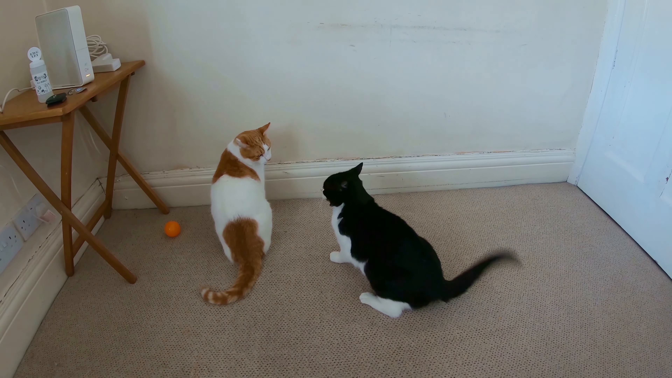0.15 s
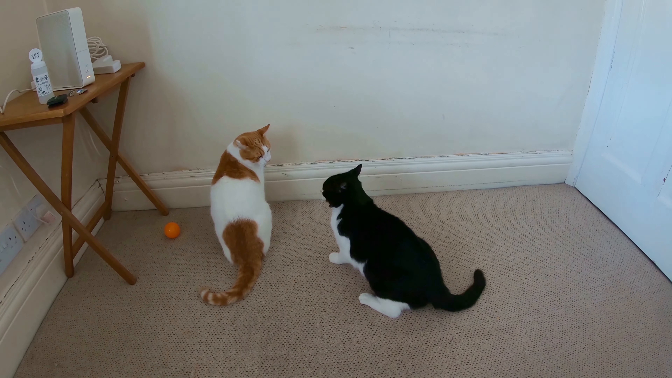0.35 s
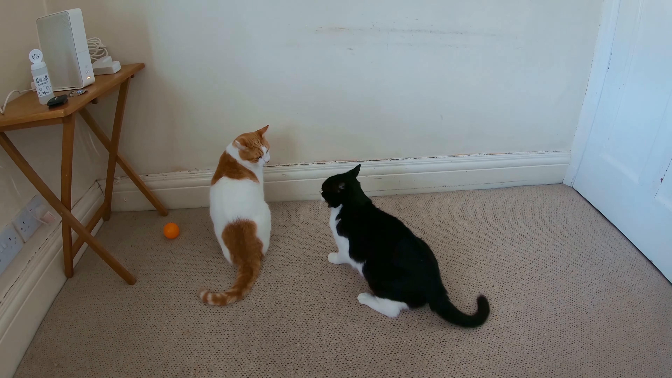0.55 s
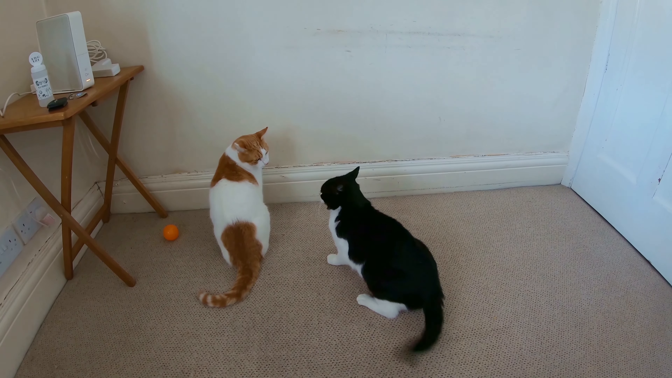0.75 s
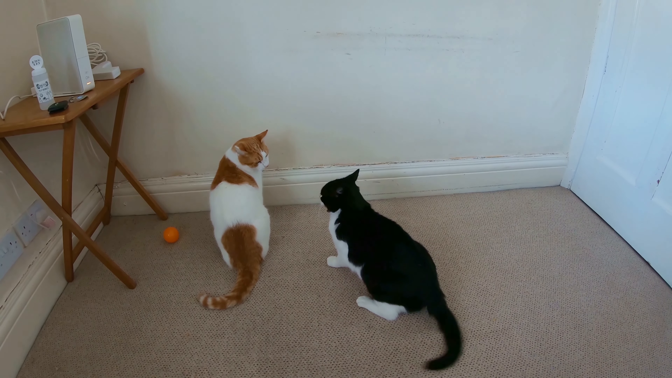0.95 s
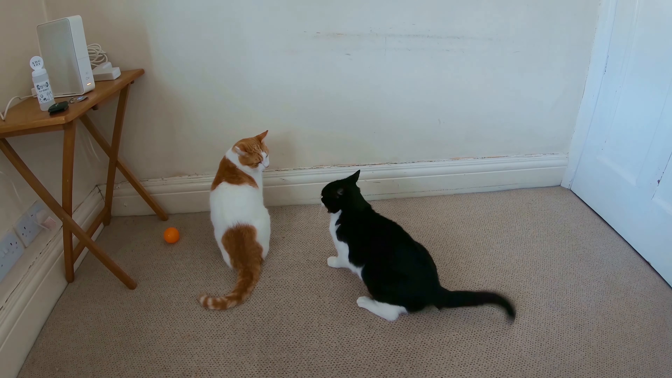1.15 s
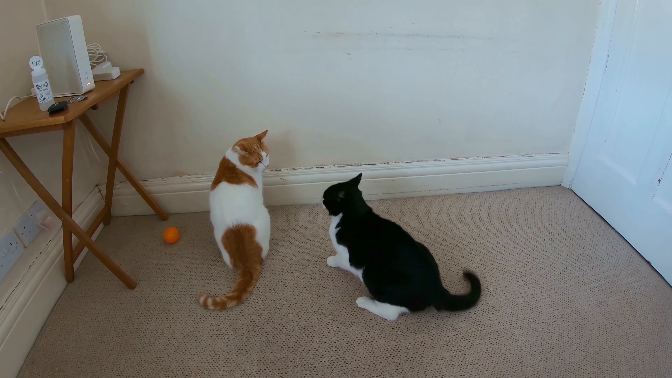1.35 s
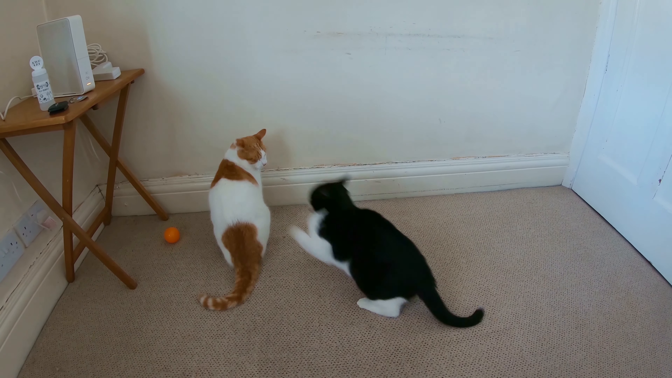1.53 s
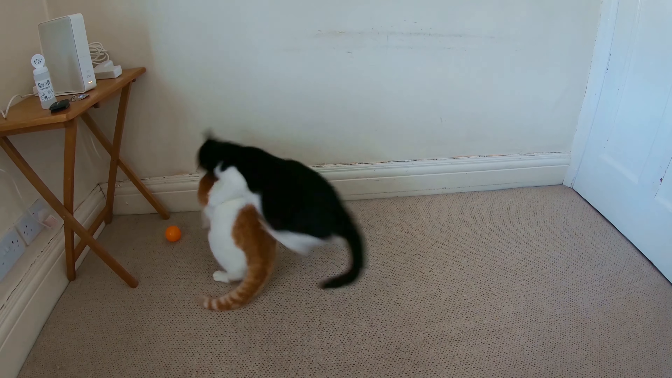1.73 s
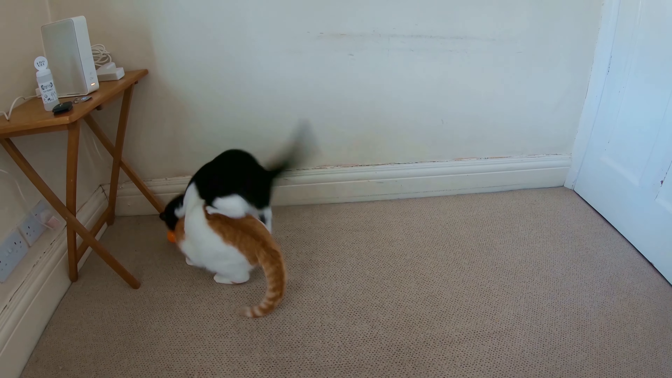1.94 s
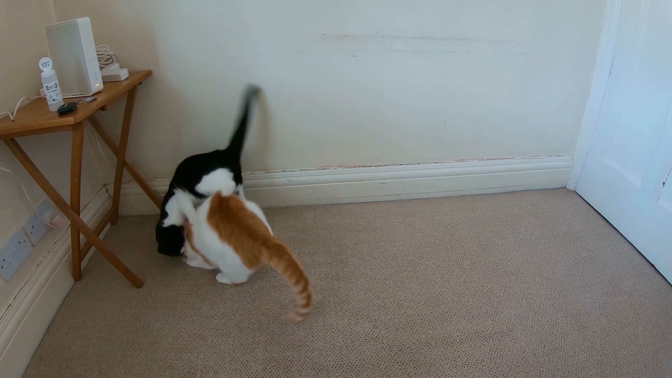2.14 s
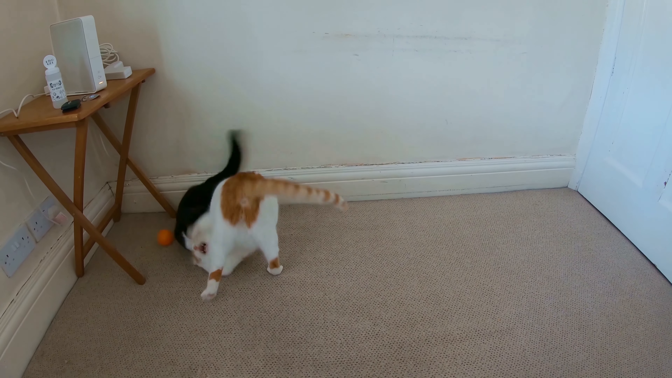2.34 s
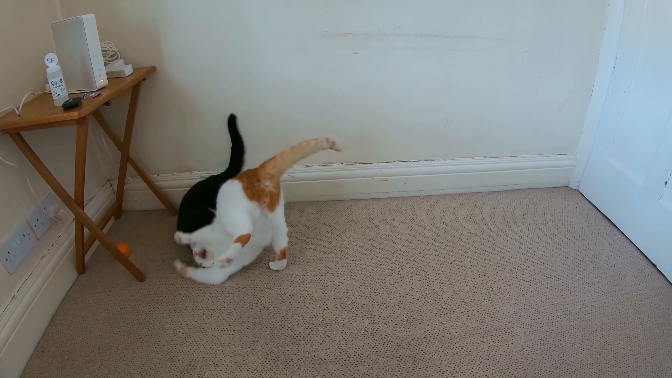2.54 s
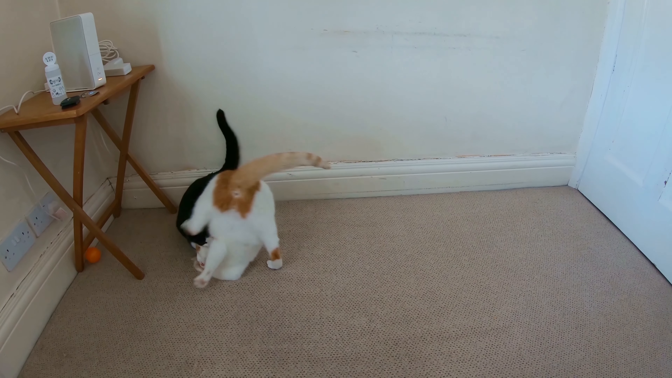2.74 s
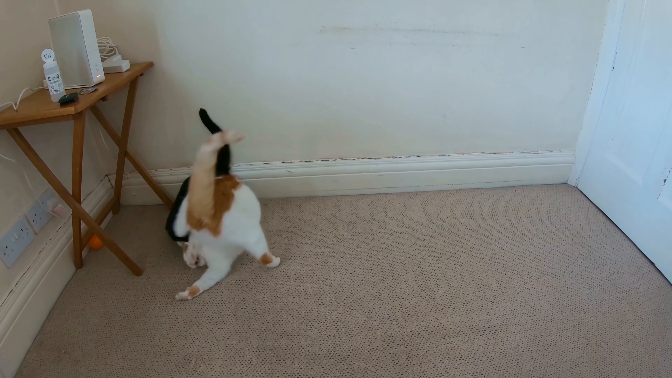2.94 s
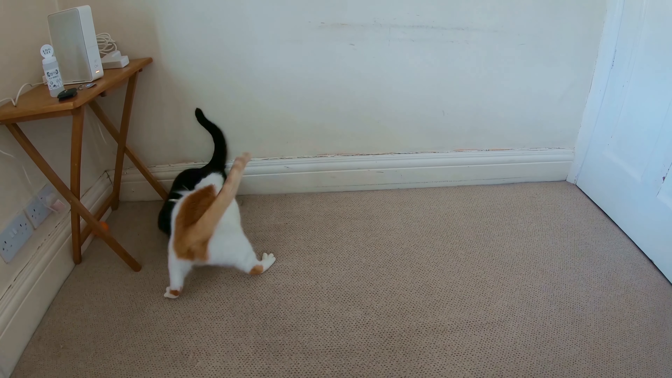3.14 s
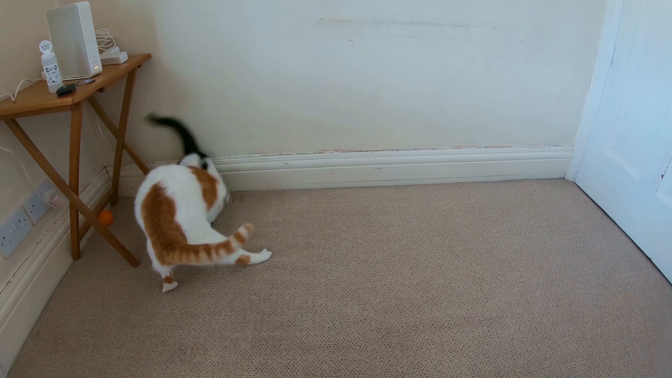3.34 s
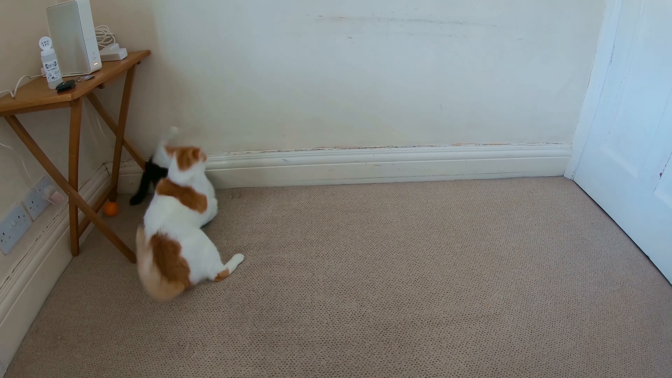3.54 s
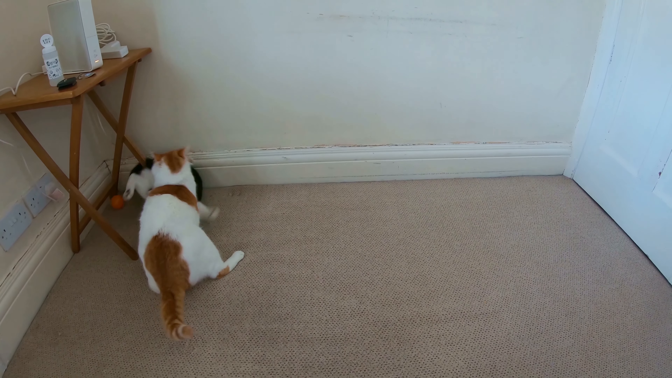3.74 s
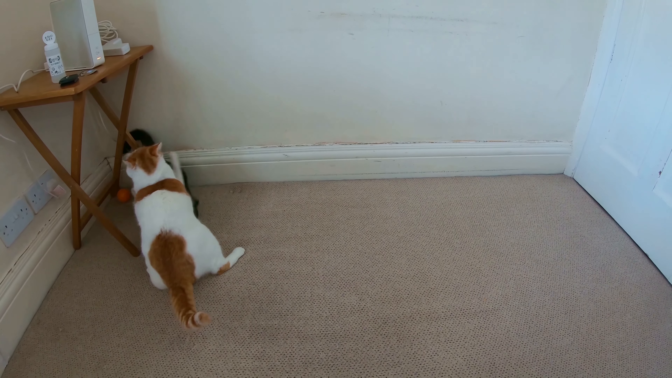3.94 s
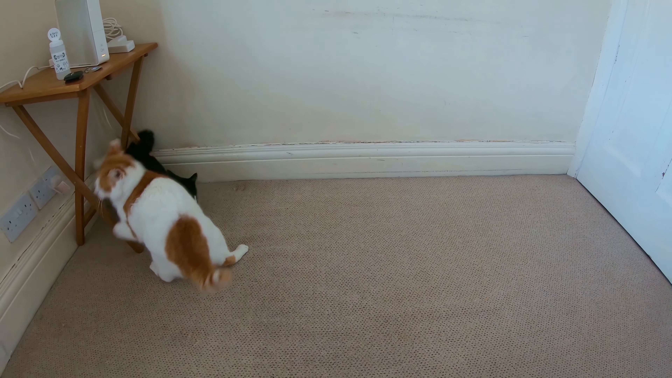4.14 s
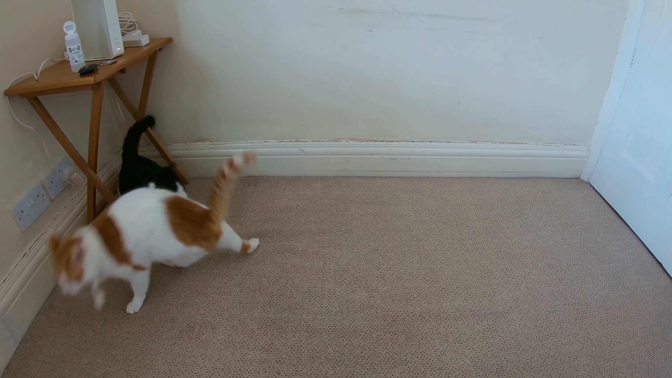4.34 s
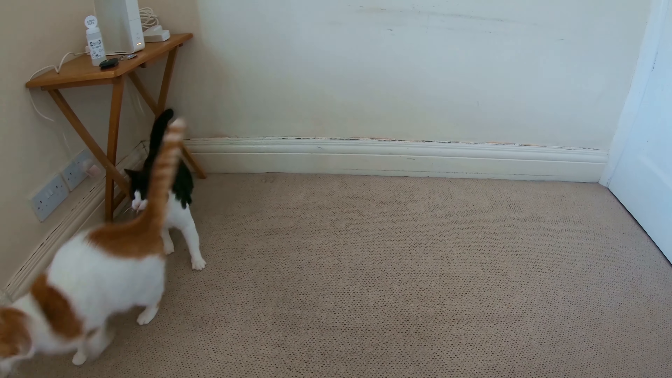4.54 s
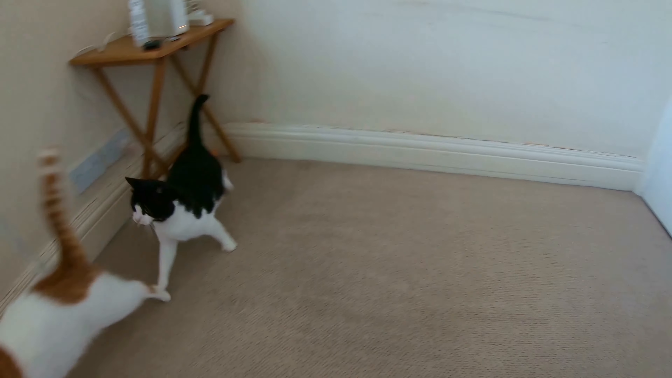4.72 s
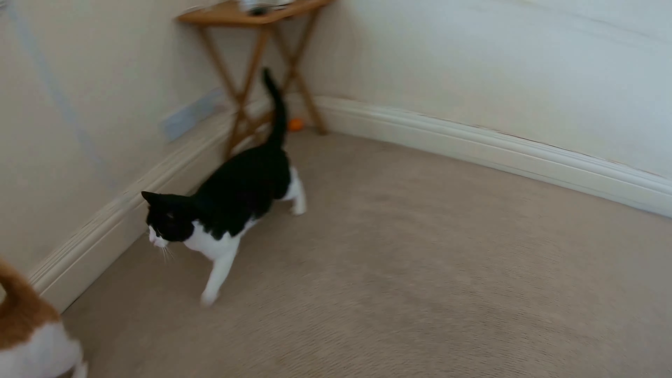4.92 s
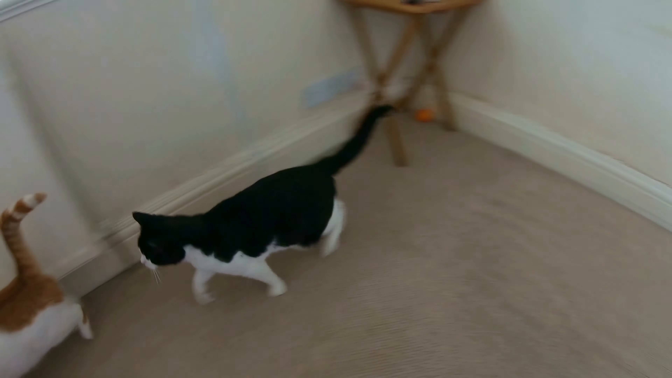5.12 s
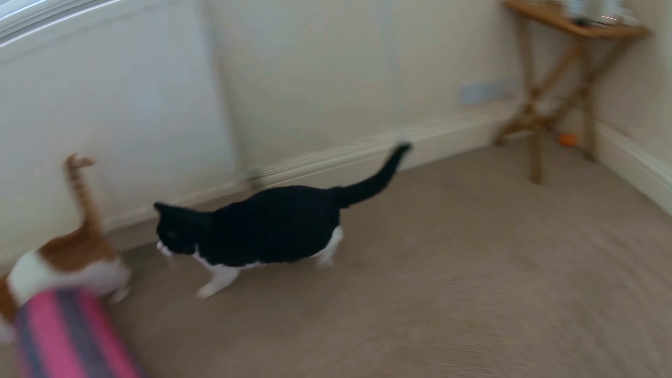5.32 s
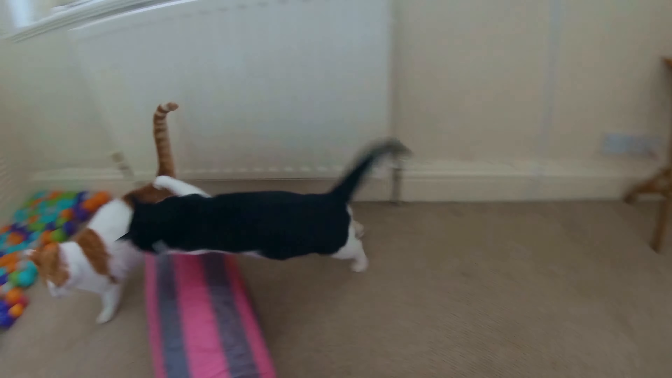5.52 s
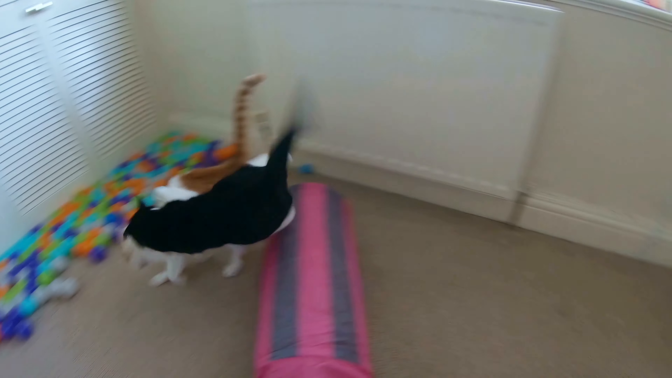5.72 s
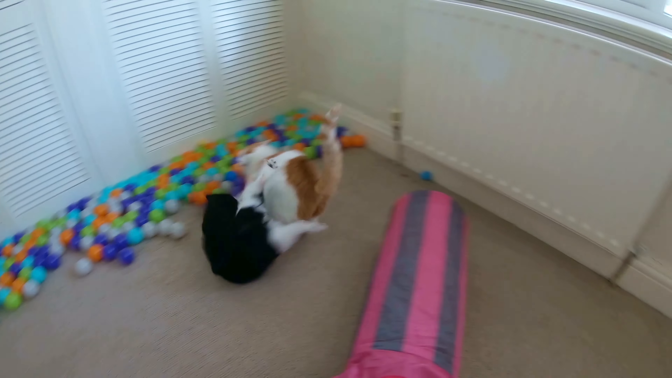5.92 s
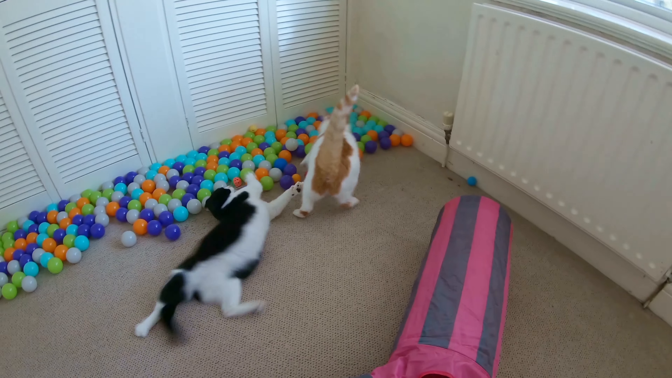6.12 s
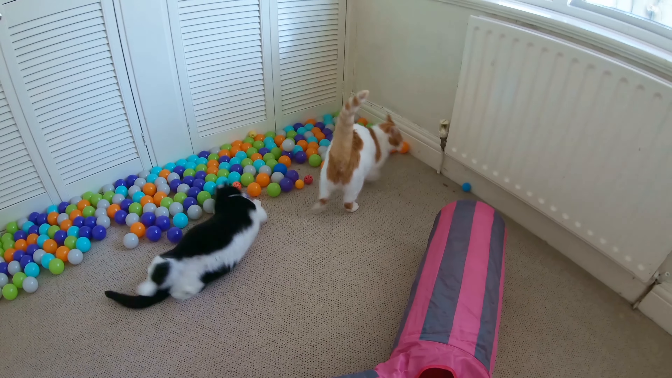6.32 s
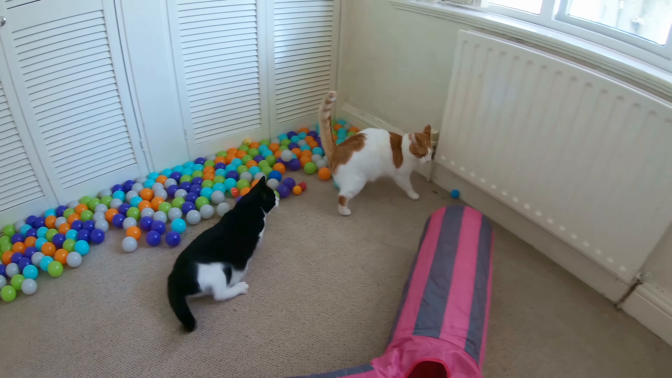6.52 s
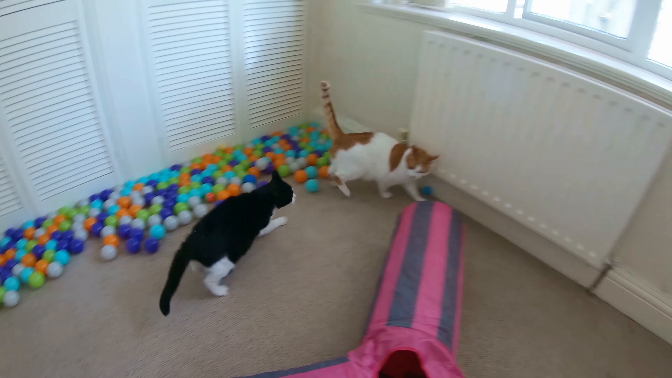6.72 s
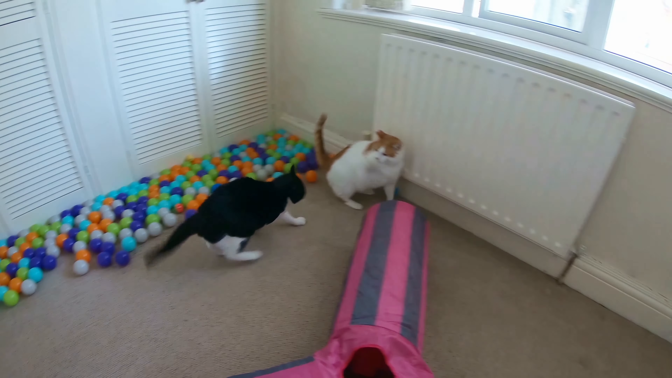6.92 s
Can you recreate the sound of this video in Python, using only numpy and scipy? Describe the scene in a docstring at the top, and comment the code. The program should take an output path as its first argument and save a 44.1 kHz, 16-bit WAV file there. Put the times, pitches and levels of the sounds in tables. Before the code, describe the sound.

Dull thumps and scuffing of cats scuffling indoors build to a clatter of plastic balls and a faint jingle.

```python
"""A small room with carpet on a wooden floor, where two cats wrestle a couple of metres away.
Bodies and paws thump the boards and knock a folding table and plastic balls; fur and claws rustle
on the carpet. A pellet jingles the bell inside a rolling toy ball, and a small hard thing rattles
on the table. A brief squeak, faint ticks and two thin, far whistles sound over the still air."""
import sys
import numpy as np
from scipy import signal
from scipy.fft import rfft, irfft, next_fast_len
from scipy.io import wavfile

SR = 44100
rng = np.random.default_rng(int(sys.argv[2]) if len(sys.argv) > 2 else 0)


def wrap_up_sound(samples):
    """Save the sound to the file named by the first command line argument, as 16-bit audio."""
    columns = np.atleast_2d(samples).T
    # keep every value between -1 and 1, then stretch to whole-number steps
    tamed = np.clip(columns, -1, 1)
    steps = np.round(tamed * 32767).astype(np.int16)
    wavfile.write(sys.argv[1], SR, steps)


N = 311729
T = np.arange(N) / SR

# Tone of the still air: f/Hz, level/dB
AIR_SPECTRUM = [(15, -44), (25, 4), (107, -26), (156, 4), (227, -4.5), (331, -11), (536, -19), (581, -13.5),
                (847, -9.5), (2170, -22), (2620, -28), (9500, -33), (15500, -62)]
# How much left and right differ: f/Hz, width (their difference over their shared part)
STEREO_WIDTH = [(60, 0.84), (250, 0.39), (500, 0.34), (1000, 0.95), (2000, 0.64), (4000, 0.43),
                (8000, 1.05)]
# Thin, far whistles: t/s, length/s, f/Hz, level/dB
WHISTLES = [(0.46, 0.15, 5400, -74), (1.39, 0.089, 5400, -76)]
# Faint ticks: t/s, level/dB, lowest f/Hz, highest f/Hz
TICKS = [(1.077, -42, 300, 2000), (1.371, -48, 1700, 2300), (1.45, -52, 3000, 5000)]
# The room's echoes: f/Hz, t60/s (the time to fade by 60 dB), level/dB
ECHO_BANDS = [(171.2, 0.31, -0.5), (316, 0.33, 2), (854, 0.34, 2), (1624, 0.35, 3), (3220, 0.21, -1),
              (7650, 0.13, 1)]
# The two swells of a squeak: t/s, length/s, f/Hz, level/dB
SQUEAKS = [(3.42, 0.035, 734.4, -30), (3.468, 0.034, 757, -41)]
# A small hard thing clicking on the table: t/s, level/dB, pan/dB (left minus right)
CLICKS = [(2.78, -22.5, 2), (2.825, -28.5, 6), (2.828, -31, 2), (2.838, -36, 3)]
# Its modes, the notes it rings at: f/Hz, level/dB, t60/s
CLICK_MODES = [(2750, -8, .01), (3000, -4, .011), (3300, -1, .013), (3720, 0, .015), (4100, -12, .012)]
# How hard the bell's pellet is shaken: t/s, level/dB
BELL_SHAKE = [(6.125, -70), (6.14, -45.5), (6.2, -40.5), (6.28, -47.5), (6.44, -48.5), (6.49, -59),
              (6.52, -45), (6.62, -53.5), (6.66, -55.5), (6.72, -58), (6.89, -80.5)]
# The bell's modes at first, and as the ball slows: f/Hz, level/dB, t60/s
BELL_LOW_MODES = [(6150, -4, .012), (6340, 0, .015), (6560, 0, .012), (6750, 1, .012), (6930, -1, .012),
                  (7130, -1, .035), (7230, -2, .03)]
BELL_HIGH_MODES = [(6430, -9, .018), (6950, -3, .008), (7300, -4, .01), (7505, -3, .045), (7820, -7, .01),
                   (8137, -9, .07)]
# Knocks on table legs, skirting and balls: t/s, level/dB, f/Hz, added crack/dB, pan/dB
KNOCKS = [(2.222, -35, 738, -34, -1), (2.39, -8.5, 556, -40, 2.5), (2.391, -14.5, 1010, -38, 1),
          (3.185, -22, 1190, -45, 15), (3.194, -18.5, 1170, -48, 11), (3.202, -3, 1102, -46, 1.5),
          (3.202, -21.5, 2670, -25, 3), (3.215, -21, 1050, -34, 0), (3.42, -18, 1550, -40, 8),
          (3.533, -17.5, 2730, -12, 4), (4.34, -18.5, 1620, -17, 9), (4.343, -20, 2940, -9, 11),
          (4.39, -22, 1970, -30, 6), (4.888, -37, 620, -26, 2), (5.514, -27, 703, -54, -9),
          (5.788, -10.5, 2170, -11, -3), (5.798, -21, 3550, -20, 5), (6.046, -18, 570, -40, 8),
          (6.072, -14.5, 1100, -42, 5), (6.085, -13, 3960, -20, 3), (6.116, -14, 572, -42, 0),
          (6.253, -24, 3500, -20, 0), (7.008, -28, 603, -29, 4)]
# The wrestling as a whole: t/s, fur drag/dB, paw patter/dB
WRESTLING = [(1.4, -72, -72), (2.05, -56.5, -51.5), (2.42, -41.5, -47), (2.55, -67, -58.5),
             (2.79, -48.5, -49.5), (3.2, -53, -39.5), (3.48, -45.5, -44), (3.67, -56.5, -44),
             (3.91, -60, -55.5), (4.37, -56, -50.5), (4.52, -48.5, -38), (4.62, -52, -46.5),
             (4.72, -58.5, -40), (5.3, -59.5, -49), (5.84, -51.5, -47.5), (5.96, -42, -24),
             (6.15, -53, -32), (6.32, -40.5, -32.5), (6.468, -52, -66), (7.07, -52, -45.5)]
# Claws and fur scuffing the carpet, balls scattering: t/s, level/dB, t60/s, brightness/dB
SCUFFS = [(.364, -46, 0.35, -11.5), (2.297, -42.5, 1, -10.5), (2.395, -38.5, 0.54, -7.5),
          (2.45, -40, 0.21, -5), (2.824, -37, 0.25, -6), (3.103, -36, 0.82, -13), (3.202, -30, 0.22, -38),
          (3.297, -34, 0.55, -36), (3.368, -30, 0.35, -15.5), (3.48, -44, 0.62, -3.5),
          (3.533, -23, 0.21, -30), (3.579, -33.5, 0.39, -16), (3.844, -54.5, 1, -4),
          (4.343, -28, 0.48, -33), (4.354, -34, 0.15, -3.5), (4.387, -28.5, 0.33, -33),
          (4.648, -47.5, 0.71, -29), (5.347, -48, 0.49, -11), (5.514, -44, 0.32, -35),
          (5.77, -23, 0.59, -8.5), (5.79, -22, 0.38, 1.5), (5.957, -29, 0.53, -3.5),
          (6.072, -20.5, 0.59, -12), (6.101, -30.5, 1, -2.5), (6.25, -23.5, 0.25, -7),
          (6.544, -41.5, 0.14, -2.5), (6.668, -38.5, 0.4, -11), (6.771, -38, 0.28, -8)]
# Fur sweeping slowly over the carpet: t/s, level/dB, t60/s, brightness/dB
SWISHES = [(1.62, -56.5, .98, -0.5), (1.885, -52, 0.86, -5.5), (2.07, -50, 0.24, -10),
           (2.32, -38.5, 0.68, -11.5), (3.97, -50.5, 0.97, -9), (4.965, -47, 0.87, -6.5),
           (5.62, -45.5, 0.72, -5.5)]
# Tone of the carpet's hiss: f/Hz, level/dB
CARPET_SPECTRUM = [(1470, -24), (2500, 2.5), (3220, 5), (4040, 2), (4400, -1), (6290, -2.5), (10100, -10),
                   (11400, -24), (14200, -46)]
# Crisp treble of plastic balls, thinning as they scatter: t/s, level/dB against the hiss
BALL_CRISPNESS = [(5.76, -14), (6.1, -26)]
# Modes of the floorboards and of the beams under them: f/Hz, level/dB, t60/s
BOARD_MODES = [(174.6, 2, 0.12), (204.6, 3.5, 0.19), (245.6, 4.5, 0.065), (314, 3, 0.052), (377, -4, 0.049),
               (422, -2.5, 0.069), (507, -3.5, 0.035), (626, -8.5, 0.029), (716, -16.5, 0.15)]
BEAM_MODES = [(43, -12.5, 0.24), (76.9, -1, 0.27)]
# Bodies and paws hitting floor and wall: t/s, level/dB, f/Hz, added boom/dB
THUMPS = [(0.367, -24, 207, -13.5), (.384, -26.5, 338, -46), (0.419, -27.5, 241, -44),
          (1.37, -48, 250, -36), (1.636, -42, 173, -4.5), (1.785, -30, 127, 2.5), (1.916, -31, 82, 9.5),
          (1.955, -21, 90, 2), (2, -34, 70, 14.5), (2.148, -50.5, 78, 17), (2.259, -30.5, 70.5, -23),
          (2.344, -16.5, 71.5, -0.5), (2.392, -7.5, 126.5, -21), (2.394, -16, 235, -42),
          (2.396, -15, 370, -39), (2.428, -22, 115, 7.5), (2.428, -9.5, 473, -42), (2.825, -22.5, 220, -40),
          (2.955, -31, 193, -45), (3.094, -14, 402, -29), (3.114, -16, 460, -15), (3.172, -14.5, 380, -18),
          (3.199, -10.5, 445, -44), (3.362, -23, 207, -5), (3.534, -15, 390, -37), (3.548, -16.5, 455, -42),
          (3.587, -19, 171, -42), (3.628, -16, 208, -22), (4.343, -25, 210, -9), (4.408, -11, 175, -16),
          (4.443, -23.5, 204, -26), (4.65, -22, 213, -48), (4.69, -36, 213, -36), (4.765, -28, 230, -28),
          (4.831, -30.5, 222, -10), (4.988, -31.5, 72.6, -26), (5.044, -32, 155, -2.5),
          (5.172, -24, 67.4, -11), (5.344, -28.5, 196, -15), (5.357, -21.5, 230, -8), (5.389, -26, 135, 1),
          (5.49, -12.5, 126.5, -10), (5.526, -22.5, 132, -12), (5.778, -14.5, 114, -9),
          (5.821, -15, 220, -7), (5.979, -7.5, 110, -18), (6.016, -18, 115, -30), (6.046, -3, 195, -42),
          (6.059, -6.5, 217, -36), (6.08, -7.5, 141.5, -36), (6.114, -10, 219, -15), (6.173, -25, 150, -26),
          (6.251, -8, 268, -16.5), (6.426, -21.5, 109, -6.5), (6.642, -28, 235, -47),
          (6.295, -20, 342, -30), (6.345, -19.5, 277, -36), (6.784, -31, 222, -34), (6.819, -26, 460, -25),
          (6.465, -31.5, 109.4, -10), (6.986, -24.5, 93, -1.5), (7.031, -22.5, 157.5, -13)]

NARROW_BASS = 0.22  # echoes and patter have narrower bass than the still air


def undb(db):
    """Turn decibels into a factor to multiply by."""
    return 10 ** (np.asarray(db) / 20)


def unit(x):
    """Scale x to an average power of 1."""
    return x / np.sqrt(np.mean(x ** 2))


def unit_peak(x):
    """Scale x so its biggest swing is 1."""
    return x / np.max(np.abs(x))


def band(x, lo_hz, hi_hz):
    """Keep mainly what lies between two frequencies."""
    return signal.sosfilt(signal.butter(2, [lo_hz, hi_hz], "bandpass", fs=SR, output="sos"), x)


def fade(t, t60):
    """Fall by 60 dB every t60 seconds."""
    return np.exp(-np.log(1000) * t / max(t60, .004))


def modes(x, table):
    """The sound of x ringing an object with these modes."""
    poles = [(undb(db), np.exp(2j * np.pi * hz / SR) * fade(1 / SR, t60)) for hz, db, t60 in table]
    return sum(gain * signal.lfilter([1], [1, -pole], x).imag for gain, pole in poles)


def colour(x, table, in_db=True):
    """Make each frequency of x louder or softer, as the table says."""
    size = next_fast_len(x.shape[-1], real=True)
    hz = np.maximum(np.fft.rfftfreq(size, 1 / SR), 1)
    table_hz, levels = np.transpose(table)
    weight = np.interp(np.log(hz), np.log(table_hz), levels)
    return irfft(rfft(x, size) * (undb(weight) if in_db else weight), size)[..., :x.shape[-1]]


def stereo_noise(size=N, bass_width=1.):
    """Noise that is partly the same on the left and right."""
    mid, side = rng.standard_normal((2, size))
    widths = [(hz, width * (bass_width if hz < 400 else 1)) for hz, width in STEREO_WIDTH]
    side = colour(side, widths, in_db=False)
    return np.array([mid + side, mid - side])


def wobble(size, lo_hz, hi_hz):
    """A random wavering between two speeds."""
    return unit(band(rng.standard_normal(size), lo_hz, hi_hz))


def crackle(per_s, spread_db, length_s):
    """A crackling loudness: scattered slips of uneven size, each dying quickly."""
    slips = (rng.random(N) < per_s / SR) * undb(spread_db * rng.exponential(size=N))
    power = signal.lfilter([1], [1, -np.exp(-1 / (length_s * SR))], slips ** 2)
    return unit(np.sqrt(1.2 + power))


def pan(db, pan_db):
    """Left and right gains, pan_db apart."""
    return undb(db + np.array([[pan_db], [-pan_db]]) / 2)


def add(out, start_s, sound):
    """Mix a sound into out at the given time."""
    i = int(start_s * SR)
    out[:, i:i + sound.shape[-1]] += sound[..., :N - i]


def still_air():
    """A quiet, steady rush, mostly bass."""
    return undb(-59.5) * unit(colour(stereo_noise(), AIR_SPECTRUM))


def far_whistles(fall_hz=60.5):
    """Faint, thin tones that flutter and fall a little in pitch."""
    out = np.zeros((1, N))
    for start, length, hz, db in WHISTLES:
        t = T[:int(length * SR)]
        swell = np.sin(np.pi * t / length) ** 0.28
        flutter = 1 + 0.4 * wobble(len(t), 10, 60)
        tone = np.sin(2 * np.pi * (hz - fall_hz * t / length / 2) * t)
        add(out, start, undb(db) * swell * flutter * tone)
    return out


def faint_ticks():
    """Each tick is one pulse, narrowed to a band of frequencies."""
    out = np.zeros((1, N))
    for start, db, lo_hz, hi_hz in TICKS:
        tick = band(band(signal.unit_impulse(SR // 20), lo_hz, hi_hz), lo_hz, hi_hz)
        add(out, start, undb(db) * unit_peak(tick))
    return out


def room_echoes(x):
    """Dense echoes of x build up in a few milliseconds and die away, the treble first."""
    t = T[:SR // 2]
    noise = stereo_noise(len(t), NARROW_BASS)
    tail = sum(undb(db) * band(noise, hz / 1.5, hz * 1.5) * fade(t, t60) for hz, t60, db in ECHO_BANDS)
    tail *= 1 - fade(t, 0.024)
    tail /= np.sqrt(np.sum(tail ** 2) / 2)
    return signal.fftconvolve(np.mean(x, axis=0)[None], tail, axes=1)[:, :N]


def squeak(harmonics_db=(4, -9.5, -17)):
    """Sticking and slipping makes a tone grate, like wood rubbing on wood."""
    out = np.zeros((1, N))
    for start, length, hz, db in SQUEAKS:
        t = T[:int(length * SR)]
        cycles = hz * t + 0.08 * wobble(len(t), 20, 150)
        tone = sum(undb(level) * np.sin(2 * np.pi * k * cycles) for k, level in enumerate(harmonics_db, 1))
        grate = 1 + 0.6 * wobble(len(t), 40, 600)
        swell = np.sin(np.pi * t / length) ** 0.25
        add(out, start, undb(db) * swell * tone * grate)
    return out


def table_clicks():
    """A sharp tap and a dying rattle of tiny contacts ring a small hard thing on the table."""
    out, t = np.zeros((2, N)), T[:SR // 3]
    for start, db, pan_db in CLICKS:
        rattle = undb(-26.5) * rng.standard_normal((2, len(t))) * fade(t, t60=0.2)
        ring = modes(signal.unit_impulse(len(t)) + rattle, CLICK_MODES)
        ring = band(band(ring, 2600, 4200), 2600, 4200)
        add(out, start, pan(db, pan_db) * ring / 2)
    return out


def toy_bell(strikes_per_s=1200, wander_db=5, slowing_s=(6.27, 6.43), dulling_s=(6.66, 6.75)):
    """A pellet rattles round the bell's shell; as the ball slows, thinner, higher modes take over."""
    high_share = np.interp(T, slowing_s, [0, 1])
    shake = undb(np.interp(T, *np.transpose(BELL_SHAKE), left=-150, right=-150))
    ring = 0
    for table, share in (BELL_LOW_MODES, 1 - high_share), (BELL_HIGH_MODES, high_share):
        for mode in table:
            strikes = rng.random(N) < strikes_per_s / SR
            force = rng.standard_normal(N) + 1.2 * rng.standard_normal((2, N))
            force *= undb(wander_db * wobble(N, 5, 30))  # the wandering pellet hits harder or softer
            if mode is BELL_HIGH_MODES[-1]:
                force *= np.interp(T, dulling_s, [1, 0])  # the top mode stops being struck
            ring = ring + modes(strikes * force * shake * share, [mode])
    return band(band(ring, 5700, 11000), 5700, 11000)


def knocks():
    """Each hard contact gives a short ring, a rough noise around that pitch and a crack on top."""
    out, t = np.zeros((2, N)), T[:SR // 4]
    for start, db, hz, crack_db, pan_db in KNOCKS:
        low, high = rng.standard_normal((2, len(t)))
        t60 = 0.031 * (1000 / hz) ** 0.92  # higher knocks die sooner
        ring = undb(-5) * np.sin(2 * np.pi * hz * t)
        rough = band(low, 0.58 * hz, 1.395 * hz)
        rough = undb(-4.5) * unit(band(rough, 0.54 * hz, min(1.4 * hz, 4200)))
        crack = undb(crack_db) * unit(colour(high, CARPET_SPECTRUM))
        shape = fade(t, t60) * (1 - fade(t, 0.004))
        add(out, start, pan(db, pan_db) * (ring + rough + crack) * shape)
    return out


def carpet_scuffle(drag_brightness_db=-6.5, scuff_rise_s=0.0014, swish_rise_s=0.04):
    """Dragging bodies make a dull rub and a crackling hiss in the carpet; paws patter on the boards."""
    times, drag_db, patter_db = np.transpose(WRESTLING)
    drag_gain = undb(np.interp(T, times, drag_db, left=-120))
    patter_gain = undb(np.interp(T, times, patter_db, left=-120))
    ball_gain = undb(np.interp(T, *np.transpose(BALL_CRISPNESS), left=-120))
    rub_power = drag_gain[None] ** 2
    hiss_power = rub_power * undb(drag_brightness_db) ** 2
    t = T[:SR // 2]
    for strokes, rise in (SCUFFS, scuff_rise_s), (SWISHES, swish_rise_s):
        for start, db, t60, brightness_db in strokes:
            stroke = undb(db) * np.minimum(t / rise, 1) * fade(np.maximum(t - rise, 0), t60)
            add(rub_power, start, stroke ** 2)
            add(hiss_power, start, (stroke * undb(brightness_db)) ** 2)
    rub = unit(band(stereo_noise(), 270, 1883)) * crackle(180, 0.26, 0.017)
    hiss = unit(colour(stereo_noise(), CARPET_SPECTRUM)) * crackle(150, 2.11, 0.0084)
    balls = ball_gain * unit(band(stereo_noise(), 9600, 13100)) * crackle(100, 1.2, 0.0045)
    paws = stereo_noise(bass_width=NARROW_BASS) * crackle(40, 2.5, 0.028)
    patter = unit(modes(paws, BOARD_MODES))
    return np.sqrt(rub_power) * rub + np.sqrt(hiss_power) * (hiss + balls) + patter_gain * patter


def body_thumps(push_s=0.013):
    """A soft push rings the spot it hits, sets the boards rumbling and booms in the beams below."""
    out, t = np.zeros((1, N)), T[:SR // 3]
    push = np.sin(np.pi * np.minimum(t / push_s, 1))
    boom = unit_peak(modes(push, BEAM_MODES) * (1 - fade(t, 0.046)))
    for start, db, hz, boom_db in THUMPS:
        t60 = 0.072 * min(200 / hz, 1.3)  # higher notes die sooner
        soft_start = 1 - np.exp(-t * hz / 0.2)  # a soft body presses in over part of a cycle
        spot = np.sin(2 * np.pi * hz * t) * fade(t, t60) * soft_start
        boards = modes(rng.standard_normal(len(t)) * fade(t, 1.67 * t60), BOARD_MODES)
        rumble = unit_peak(band(boards, 0.74 * hz, min(3.6 * hz, 900)))
        add(out, start, undb(db) * (spot + undb(boom_db) * boom + undb(-6.5) * rumble))
    return out


def scene():
    """Mix the contact sounds and their echoes with the scuffle and the background."""
    contacts = body_thumps() + knocks() + table_clicks() + faint_ticks() + squeak() + toy_bell()
    return still_air() + contacts + undb(-4) * room_echoes(contacts) + carpet_scuffle() + far_whistles()


def record(dry, bass_hz=36, peak_limit=0.85, top_hz=15100):
    """Drop the deepest bass, round off the loudest peaks and cut the highest treble."""
    trimmed = signal.sosfilt(signal.butter(4, bass_hz, "highpass", fs=SR, output="sos"), dry)
    rounded = trimmed / (1 + (trimmed / peak_limit) ** 4) ** .25
    return signal.sosfilt(signal.ellip(8, .2, 70, top_hz, fs=SR, output="sos"), rounded)


dry = scene()
out = record(dry)
wrap_up_sound(out)
```